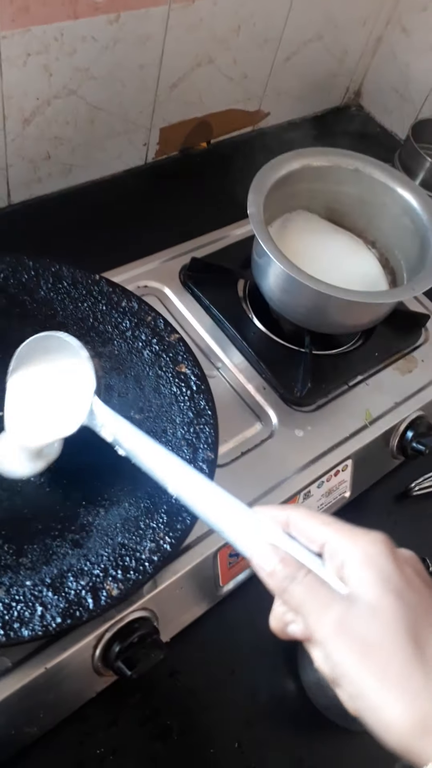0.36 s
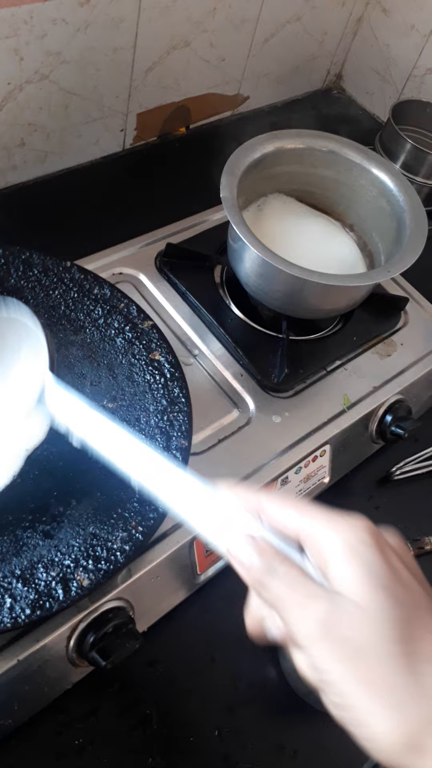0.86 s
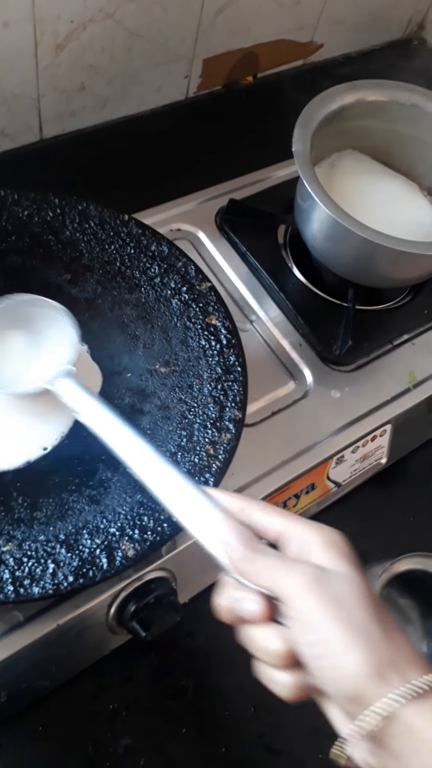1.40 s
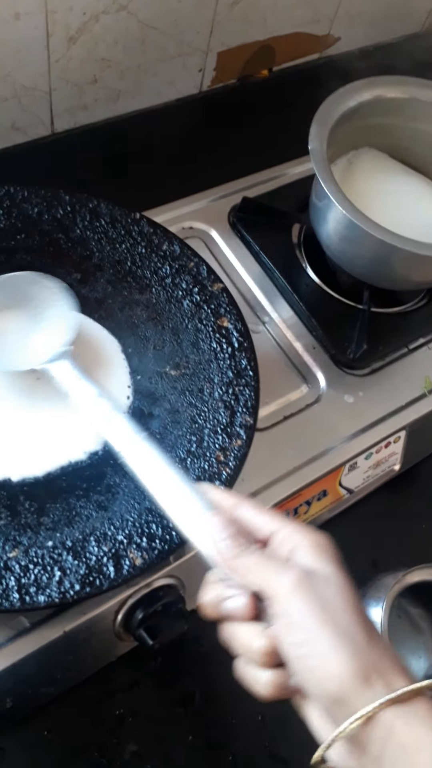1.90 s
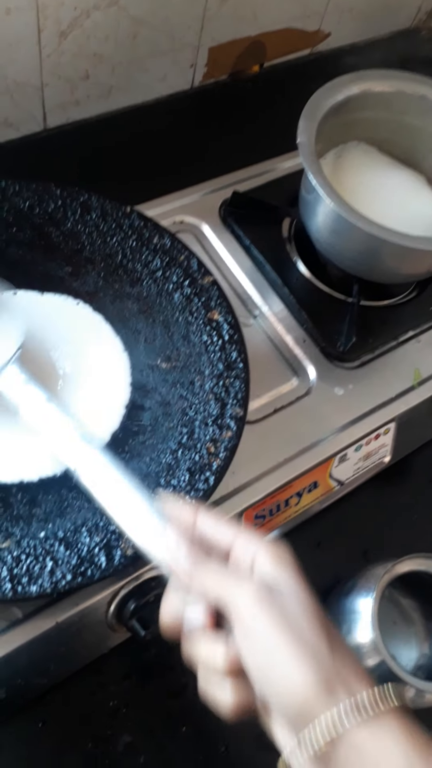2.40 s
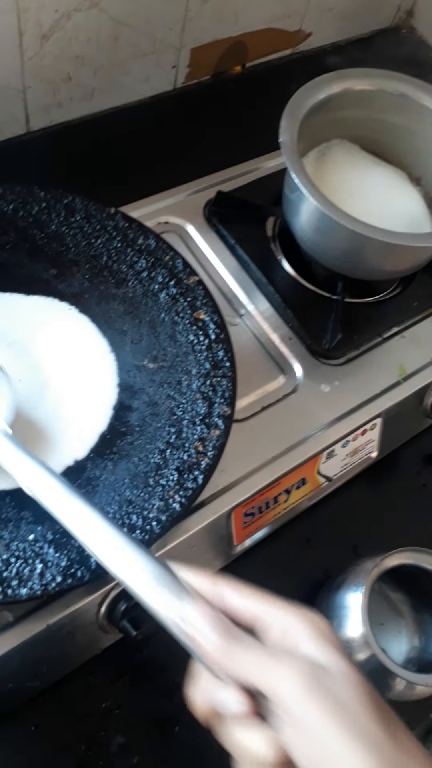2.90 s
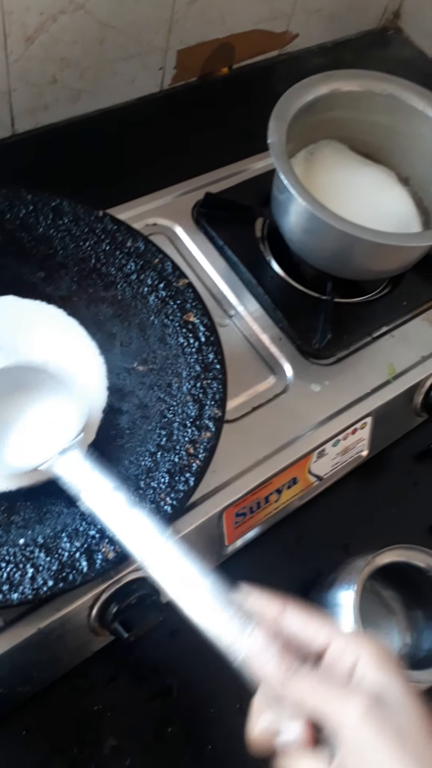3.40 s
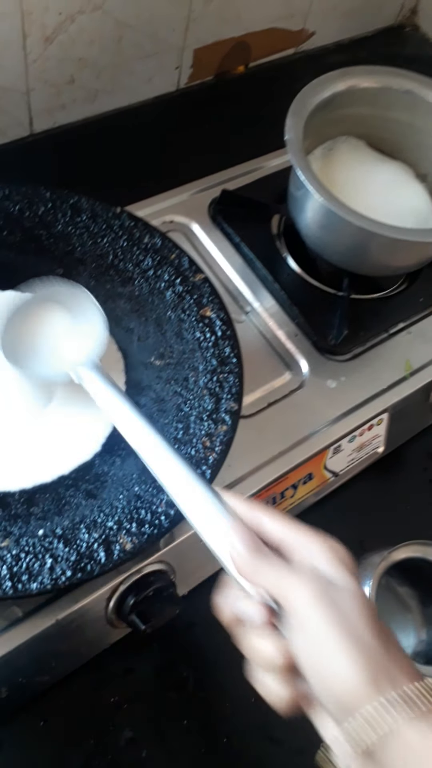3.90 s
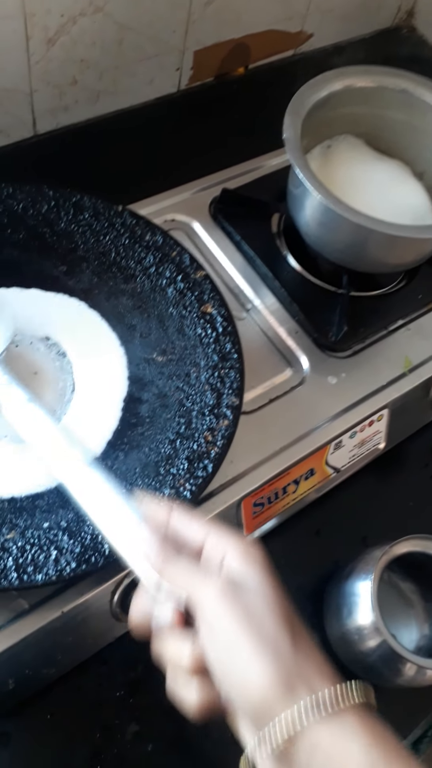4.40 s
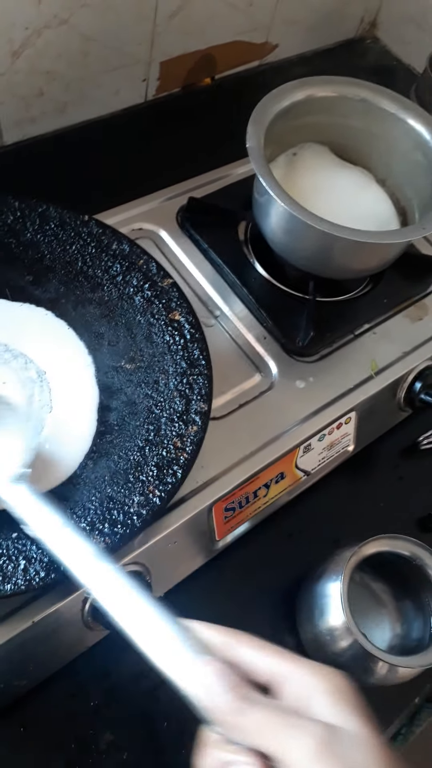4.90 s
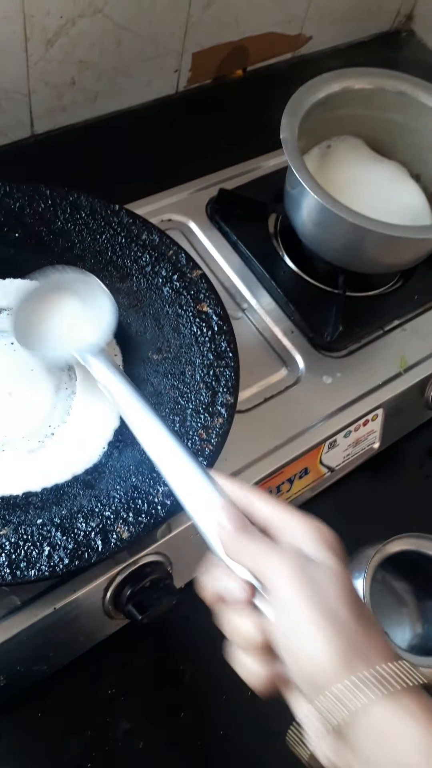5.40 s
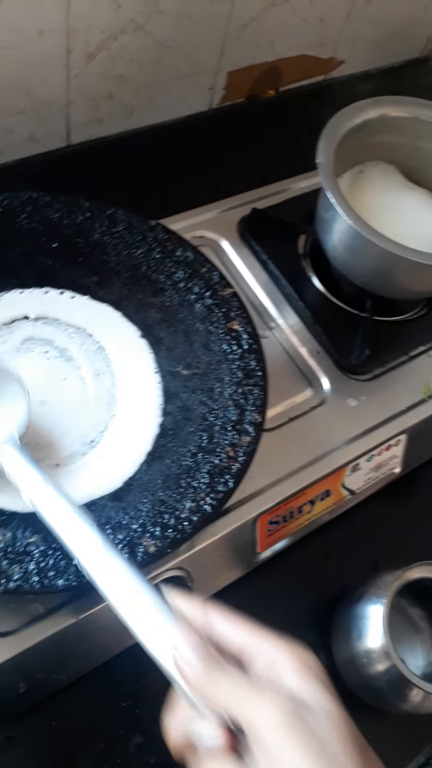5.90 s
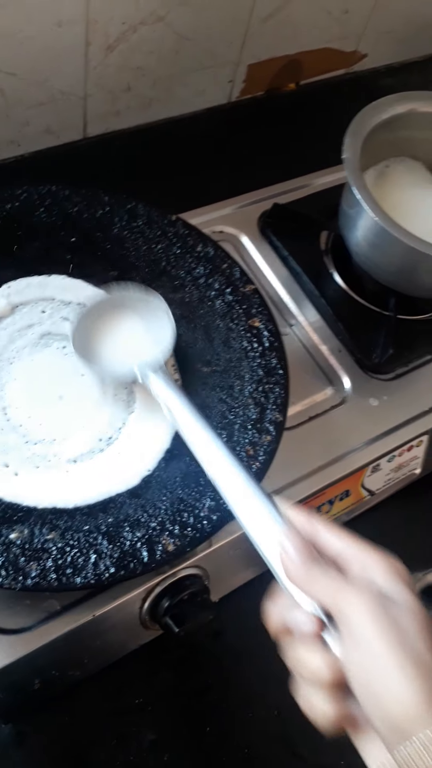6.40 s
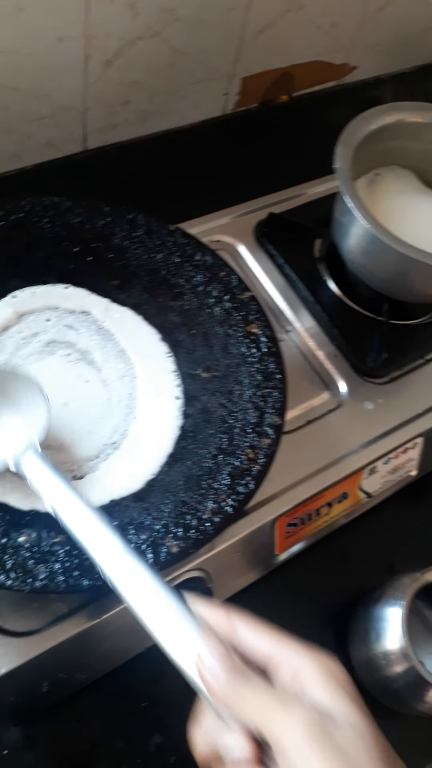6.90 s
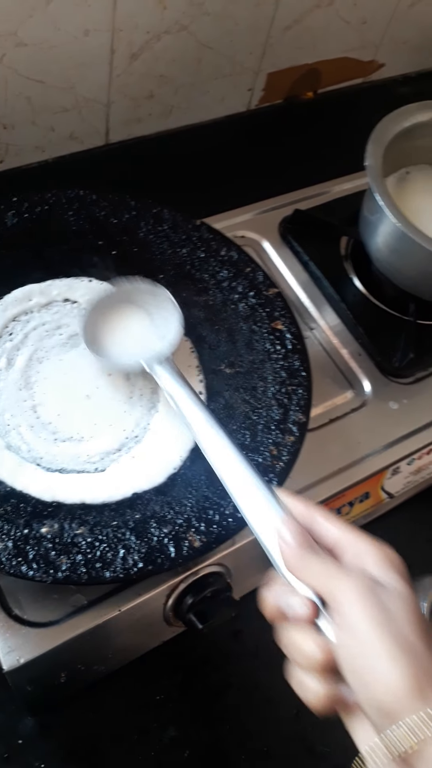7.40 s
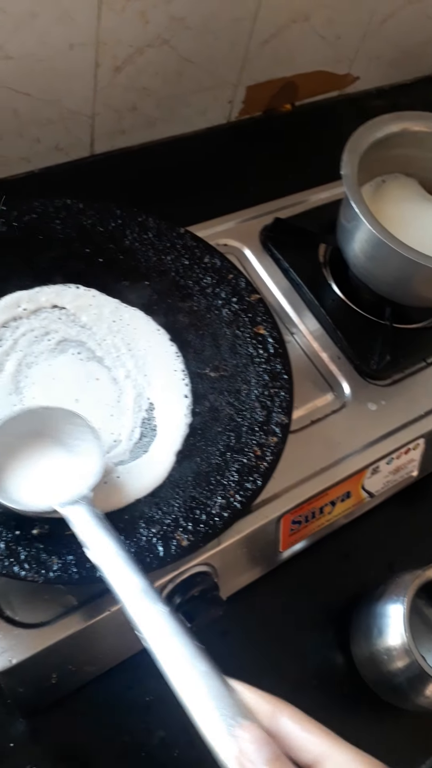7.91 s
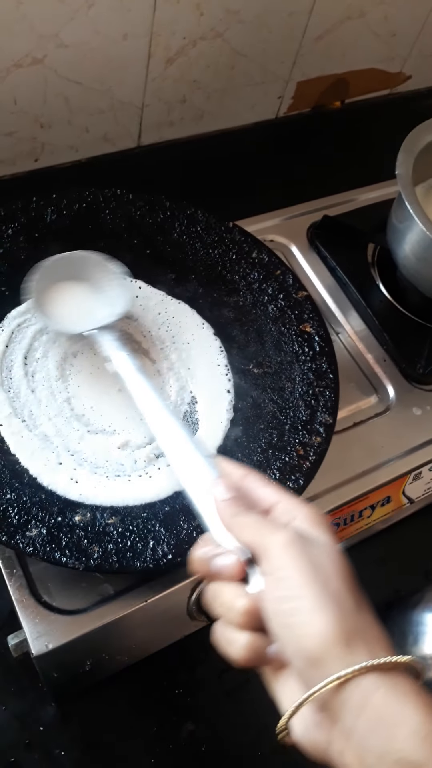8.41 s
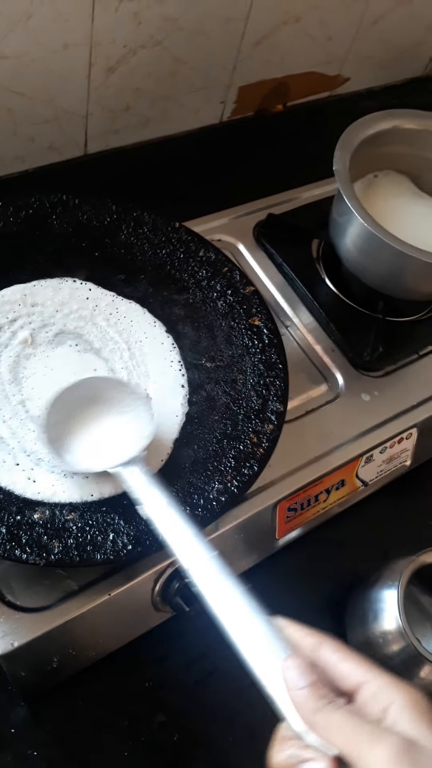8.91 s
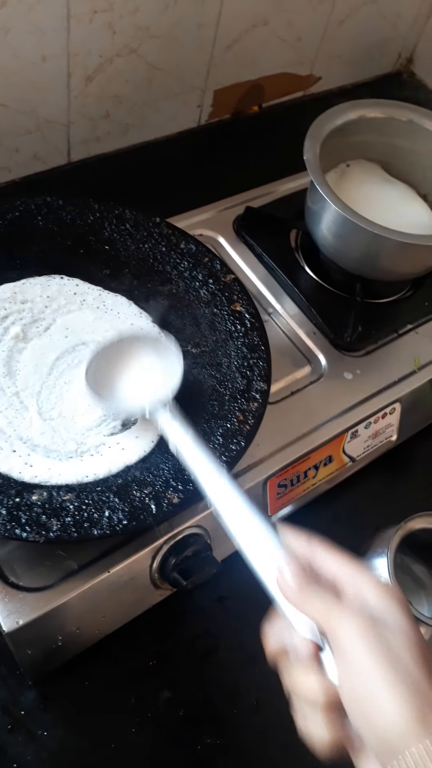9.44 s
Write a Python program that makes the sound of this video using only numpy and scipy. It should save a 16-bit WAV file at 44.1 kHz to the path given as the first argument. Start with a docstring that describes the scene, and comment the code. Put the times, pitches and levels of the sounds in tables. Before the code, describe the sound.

Close phone microphone in a home kitchen: wet batter sizzles on an iron pan, strongest in the first two seconds, then swelling and dipping about once or twice a second. The fizz is bright and grainy with a metallic edge. Low gas rumble sits underneath. Background wooden knocks and soft thuds punctuate the middle; sharp pops and thin bangle ticks stand out as the sizzle weakens towards the end.

```python
"""Batter on a hot iron pan

Batter is poured on a hot iron pan and spread in circles with a steel ladle. Steam bubbles burst under it
in surges (noise and sparse clicks in five bands) and ring the iron (resonances driven by bursts).
A gas flame and the room hum low (coloured noise), single pops spit, bangles jingle on the cook's wrist
(ticks ringing metal modes), and wooden knocks and dull thuds (decaying modes with noise) come from
further off in the kitchen. One phone microphone, close by."""
import sys
import numpy as np
from scipy import signal
from scipy.fft import rfft, irfft, next_fast_len
from scipy.io import wavfile
from scipy.ndimage import uniform_filter1d

SR = 44100
rng = np.random.default_rng(int(sys.argv[2]) if len(sys.argv) > 2 else 0)


def persist_wave(psi):
    """Save psi, clipped to +-1, as 16-bit WAV."""
    counts = np.round(np.clip(psi, -1, 1) * 32767).astype(np.int16)
    wavfile.write(sys.argv[1], SR, np.atleast_2d(counts).T)


def makeup_ratio(level_db):
    """Linear amplitude ratio for a level in decibels (20 dB per factor of ten)."""
    decades = np.asarray(level_db, float) / 20
    return 10 ** decades


N = 421155
TIME = np.arange(N) / SR
SIZE = next_fast_len(N)
FREQ = np.arange(SIZE // 2 + 1) * SR / SIZE + 1e-3  # the offset avoids division by 0


def unit(x):
    """Scale to rms 1."""
    return x / np.sqrt(np.mean(x ** 2))


def shaped(x, gain):
    """Filter by a response given on the frequency grid."""
    return irfft(rfft(x, SIZE) * gain, SIZE)[:N]


def colour(table):
    """Gain on the frequency grid of a (frequency [Hz], level [dB]) table, joined along log frequency."""
    hz, db = np.transpose(table)
    return makeup_ratio(np.interp(np.log(FREQ), np.log(hz), db))


def between(low_hz, high_hz, order=6):
    """Band with soft power-complementary edges."""
    return 1 / np.sqrt((1 + (low_hz / FREQ) ** order) * (1 + (FREQ / high_hz) ** order))


def resonance(hz, width_hz):
    """Causal resonance, gain 1 at the centre."""
    return 1 / (1 + 1j * (FREQ - hz ** 2 / FREQ) / width_hz)


def walk(rate):
    """Random levels held 1 / rate s and slewed twice; rms 1."""
    hold = int(SR / rate)
    steps = np.repeat(rng.standard_normal(N // hold + 1), hold)
    slewed = uniform_filter1d(uniform_filter1d(steps, hold), hold)
    return unit(slewed[:N])


def add(out, s, sound):
    """Mix a sound in at time s."""
    i = int(s * SR)
    out[i:i + len(sound)] += sound[:N - i]


def ring(hz, t60, length=.6):
    """One mode decaying by 60 dB in t60 seconds."""
    t = TIME[:int(length * SR)]
    return np.sin(2 * np.pi * hz * t) * makeup_ratio(-60 * t / t60)


def band_noise(noise, order, edges_hz):
    """Noise held between two frequencies by a Butterworth filter."""
    return signal.lfilter(*signal.butter(order, edges_hz, "band", fs=SR), noise)


def room(x):
    """Tiled kitchen: the direct sound plus a decaying noise tail."""
    t60_s, tail_db = .3, -6
    t = TIME[:int(.5 * SR)]
    tail = rng.standard_normal(len(t)) * makeup_ratio(-60 * t / t60_s) * np.clip(t / 0.01, 0, 1)
    tail = tail / np.sqrt(np.sum(tail ** 2))
    return x + makeup_ratio(tail_db) * signal.fftconvolve(x, tail)[:N]


def follow(usual_db, *rule):
    """Level in dB of a layer that the boil drives: a weighted sum of the boil's departures from usual."""
    # surges as the ladle spreads batter onto bare iron: (time [s], fine fizz [dB],
    # hiss near 4 kHz [dB], body near 2.5 kHz [dB], treble [dB])
    boil = np.array([(0.0, -44, -56, -53, -49.5), (0.32, -37, -53, -52.5, -45.5), (0.4, -32, -33, -38, -43),
                     (0.53, -29, -31.5, -25.5, -49), (0.69, -26, -26, -22, -46),
                     (0.9, -27, -32.5, -24, -37), (1.25, -42.5, -46, -39, -52),
                     (1.36, -37.5, -47, -37, -46), (1.51, -28, -35.5, -32.5, -48),
                     (1.57, -28, -31, -25, -49), (1.62, -29, -25.5, -22.5, -53),
                     (1.7, -24.5, -29.5, -20.5, -39), (1.91, -29, -36, -33, -40), (2.2, -28, -31, -30, -42),
                     (2.23, -28, -29.5, -26.5, -46), (2.5, -27.5, -31.5, -32, -37),
                     (2.85, -37.5, -44.5, -38.5, -50.5), (3.08, -30.5, -34.5, -35, -40),
                     (3.24, -34, -41.5, -40, -45), (3.48, -39, -49, -41.5, -49),
                     (3.67, -26, -29.5, -32.5, -45), (3.83, -28, -33, -32, -38.5),
                     (4.12, -35, -38.5, -38, -47.5), (4.31, -26, -29.5, -33.5, -45),
                     (4.76, -35.5, -39.5, -35.5, -47), (4.92, -29.5, -35, -34.5, -49),
                     (5.24, -35, -35.5, -36.5, -47), (5.29, -30.5, -34.5, -34, -41.5),
                     (5.64, -30, -33.5, -33.5, -45), (5.98, -31, -34.5, -35.5, -46),
                     (6.36, -30.5, -33, -34, -41), (6.49, -33.5, -39.5, -40.5, -47),
                     (6.89, -40.5, -44, -33, -56.5), (7.26, -27.5, -35.5, -36, -43),
                     (7.53, -39, -43, -42.5, -51), (7.74, -39.5, -44.5, -43, -50.5),
                     (7.98, -31.5, -34, -39.5, -54), (8.08, -35, -30.5, -37, -47),
                     (8.48, -31.5, -38.5, -38, -43), (8.88, -40, -43.5, -42, -53),
                     (8.93, -41, -42.5, -41, -49), (9.18, -44, -45, -44, -53),
                     (9.31, -41, -48.5, -45, -53.5), (9.55, -46, -51, -49, -54.5)])
    # usual boil: fizz [dB], hiss [dB], body [dB], treble [dB]
    usual_boil = (-32, -37, -36, -44)
    slopes, late_s = rule[:-1], rule[-1]
    level_db = usual_db + (boil[:, 1:] - usual_boil) @ slopes
    return np.interp(TIME - late_s, boil[:, 0], level_db)


def linger(gain, seconds):
    """The power of a gain dies away exponentially, to 1/e in the given time."""
    keep = np.exp(-1 / (max(seconds, 1e-3) * SR))
    power = signal.lfilter([1 - keep], [1, -keep], gain ** 2, zi=[keep * gain[0] ** 2])[0]
    return np.sqrt(power)


def ripple(depth_db, width_hz):
    """The plate's countless weak modes: fine random peaks and dips along frequency."""
    k = int(width_hz * SIZE / SR)
    peaks = uniform_filter1d(uniform_filter1d(rng.standard_normal(len(FREQ)), k), k)
    return makeup_ratio(depth_db * unit(peaks))


def bursts(per_s, spread_db, share):
    """Bubbles bursting: sparse clicks of uneven size over the blur of countless tiny ones."""
    size = makeup_ratio(spread_db * np.minimum(rng.exponential(size=N), 3))
    clicks = (rng.random(N) < per_s / SR) * rng.standard_normal(N) * size
    share = np.clip(share, 0, 1)  # of the power
    return np.sqrt(share) * unit(clicks) + np.sqrt(1 - share) * rng.standard_normal(N)


def sizzle():
    """Steam bubbles burst in five size classes, big to tiny, that share their spurts."""
    # bubble classes: (low edge [Hz], high edge [Hz], rate [bursts/s], size spread [dB],
    # flicker [dB], burst share of power [0-1])
    bubble_classes = [(343, 1310, 2500, 0, 0.85, 0.38), (1340, 3870, 4600, 1.5, 1.58, 0.44),
                      (2720, 6550, 3700, 4, 0.8, 0.29), (5850, 7620, 5000, 2.5, 0.79, 0.47),
                      (9900, 15000, 2700, 9, 0.6, 0.25)]
    # how each class follows the boil: (usual level [dB], slope on fizz [dB/dB], on hiss [dB/dB],
    # on body [dB/dB], on treble [dB/dB], delay [s])
    bubble_rules = [(-43.5, 0.1, 0.0017, 0.71, 0.14, 0.038), (-40.5, -0.14, 0.076, 0.78, 0.16, .02),
                    (-37.5, -0.08, .9, 0.04, .02, .005), (-32, 0.81, 0.089, 0.0067, .02, .002),
                    (-37, -0.15, -0.15, .02, 1, .001)]
    # how much each class wavers on its own [dB]
    patchiness = (0.75, 0.54, .6, 0.35, 1.6)
    # how long each class goes on after a surge [s]
    linger_times = (.12, 0.039, .004, 0.003, .004)
    # tone of the fizz close to the pan: (frequency [Hz], level [dB])
    fizz_colour = [(200, -13.5), (400, -9.5), (1040, -8.5), (1500, 0.5), (2400, 4.5), (3300, 0.5),
                   (4900, -5), (6500, -1), (7200, 0.5), (8700, -6), (9500, -16), (10300, -7.5),
                   (11800, -5.5), (15800, -5.5)]

    spurt, patter = walk(14), walk(70)
    out = 0
    for bubble, rule, patchy_db, tail_s in zip(bubble_classes, bubble_rules, patchiness, linger_times):
        low_hz, high_hz, per_s, spread_db, flicker_db, share = bubble
        plate = ripple(1.1, 25)
        tone = colour(fizz_colour) * between(low_hz, high_hz) * between(355, SR, order=8) * plate
        grain = unit(shaped(bursts(per_s, spread_db, share), tone))
        surge = linger(makeup_ratio(follow(*rule)), tail_s)
        flicker = flicker_db * (spurt + 0.9 * patter) + patchy_db * walk(9)
        out = out + grain * surge * makeup_ratio(flicker)
    return out


def pan():
    """The boiling drives the iron's modes; the patch wanders over the plate, so each swells and fades."""
    # iron modes in four groups: (frequency [Hz], width [Hz], level [dB])
    deep_modes = [(1223, 32, -17), (1473, 38, -16), (1668, 45, -18), (1814, 32, -20), (2000, 35, -12),
                  (2058, 22, -12), (2120, 35, -13), (2197, 30, -5)]
    middle_modes = [(2413, 32, 0), (2550, 50, -12), (2680, 50, -12), (2847, 20, -1)]
    high_modes = [(3478, 34, 0), (3630, 50, -13), (4010, 25, -14), (4247, 26, -4), (4340, 40, -13),
                  (5150, 28, -7)]
    top_modes = [(6148, 55, -4), (7225, 60, -2), (8410, 140, -6)]
    # how each group, deep to top, follows the boil: (usual level [dB], slope on fizz [dB/dB],
    # on hiss [dB/dB], on body [dB/dB], on treble [dB/dB], delay [s], early if negative)
    mode_rules = [(-43.5, 0.0067, -0.14, 1.31, -0.011, 0.016), (-43, 0.018, 0.21, 1.09, 0.04, -0.0061),
                  (-43.5, .02, 1.29, 0.018, -0.026, -0.016), (-40.5, 0.94, 0.024, .02, -.1, -0.048)]

    drive = rfft(bursts(3000, 2.5, .4), SIZE)
    out = 0
    for modes, rule in zip((deep_modes, middle_modes, high_modes, top_modes), mode_rules):
        surge_db = follow(*rule)
        for hz, width_hz, mode_db in modes:
            wander_db = 2.0 * walk(6)
            tone = unit(irfft(drive * resonance(hz, width_hz), SIZE)[:N])
            out = out + tone * makeup_ratio(surge_db + mode_db + wander_db)
    return out


def kitchen():
    """Gas flame rumble as coloured noise, with wavering low hums as narrow bands of noise."""
    # tone of the rumble: (frequency [Hz], level [dB])
    rumble_colour = [(24, -40), (40, -12), (128, 5.5), (200, -1.5), (260, 8.5), (324, 5), (511, 5.5),
                     (699, 10), (761, -52), (1200, 0.5), (1560, -36), (2640, -120)]
    # low hums: (frequency [Hz], width [Hz], level [dB])
    hums = [(55, 16, -8), (95, 9, -3), (165, 9, -6), (182, 9, -5), (516, 20, -5), (705, 22, -6)]
    # loudness of rumble and hums: (time [s], level [dB])
    flame_levels = [(0.0, -62), (0.18, -62), (3.32, -61.5), (3.59, -56), (5.05, -62), (8.19, -59.5),
                    (8.38, -60.5), (8.88, -63), (9.55, -60)]

    rumble = shaped(rng.standard_normal(N), colour(rumble_colour) * between(45, 840))
    out = makeup_ratio(2.5) * unit(rumble)
    for hz, width_hz, db in hums:
        waver_db = 1.8 * walk(1.8)
        hum = unit(shaped(rng.standard_normal(N), resonance(hz, width_hz)))
        out += makeup_ratio(db + waver_db) * hum
    level_db = np.interp(TIME, *np.transpose(flame_levels))
    return out * makeup_ratio(level_db + 1.2 * walk(2.7))


def pops():
    """Bigger steam pockets: a few ms of noise, a body near 7 kHz and a bright spit."""
    # louder single pops: (time [s], level [dB])
    pop_times = [(0.0794, -29), (1.3423, -35.5), (3.5124, -28), (4.651, -27), (4.7212, -29.5),
                 (4.7481, -31), (6.6957, -37), (6.8054, -29.5), (6.8506, -26), (6.9735, -30),
                 (7.126, -21.5), (7.4275, -23), (7.7613, -30), (7.9914, -37.5), (9.0144, -29),
                 (9.0534, -30.5), (9.1262, -30), (9.2229, -31), (9.2844, -26.5), (9.3894, -35.5),
                 (9.4616, -28)]
    spit_db = -22  # against the body

    out, t = np.zeros(N), TIME[:int(.03 * SR)]
    envelope = np.exp(-t / 0.0042) * np.clip(t / 0.0011, 0, 1)
    for s, db in pop_times:
        noise = rng.standard_normal((2, len(t)))
        body = band_noise(noise[0], 1, [4500, 8500])
        spit = signal.lfilter(*signal.butter(2, 10000, "high", fs=SR), noise[1])
        add(out, s, makeup_ratio(db) * (unit(body) + makeup_ratio(spit_db) * unit(spit)) * envelope)
    return out


def bangles():
    """Each touch is a chatter of ticks that rings the metal modes near its favoured pitch."""
    # bangle modes: (frequency [Hz], t60 [s])
    bangle_modes = [(8930, .06), (9290, .06), (10060, .07), (10250, .05), (10590, .04), (10820, .05),
                    (11130, .04), (11400, .04), (11600, .07), (11780, .05), (12180, .04), (13330, .04),
                    (13480, .06), (13750, .06)]
    # bangles touch: (time [s], level [dB], favoured pitch [Hz], spread [Hz], rattle decay [s])
    touches = [(.194, -37, 11100, 900, 0.019), (.56, -31.5, 11130, 200, .015), (.59, -44, 13750, 100, .02),
               (1.15, -42, 10100, 200, 0.018), (1.304, -42, 10700, 900, 0.024),
               (7.675, -36, 13430, 100, 0.027), (7.676, -44, 10700, 900, 0.042),
               (8.11, -47, 10900, 915, .05), (8.475, -38.5, 11650, 200, .06),
               (8.477, -38, 13430, 100, 0.067), (8.48, -41, 10500, 300, 0.07),
               (8.91, -41, 10300, 503, 0.055), (8.93, -42, 11950, 395, 0.056),
               (8.939, -41, 13750, 99.2, 0.031), (9.27, -40, 11000, 910, .03),
               (9.275, -47, 13430, 100, 0.045), (9.29, -39, 9080, 250, 0.016),
               (9.345, -47, 11500, 696, 0.023)]

    out, t = np.zeros(N), TIME[:int(.3 * SR)]
    for s, db, centre_hz, spread_hz, rattle_s in touches:
        chatter = (rng.random(len(t)) < 900 / SR) * rng.standard_normal(len(t))
        ticks = chatter * np.exp(-t / rattle_s) * .8
        ticks[0] = .7  # first contact
        chance = rng.standard_normal((len(bangle_modes), 2))
        tone = 0
        for (hz, t60), (level, detune) in zip(bangle_modes, chance):
            favour = np.exp(-.5 * ((hz - centre_hz) / spread_hz) ** 2)
            tone = tone + favour * makeup_ratio(2 * level) * ring(hz * (1 + 0.0034 * detune), t60)
        add(out, s, makeup_ratio(db) * signal.fftconvolve(ticks, tone))
    return room(out)


def thuds():
    """Dull thuds: one low mode swells in and decays under a short boom of low noise."""
    # thuds: (time [s], level [dB], frequency [Hz], t60 [s])
    thud_times = [(1.679, -46.5, 141, 0.37), (1.721, -44, 83.5, 0.63), (3.377, -52, 184, 0.38),
                  (4.118, -37.5, 175.4, 0.35), (4.219, -51, 73, 0.29), (8.91, -48, 96.7, 0.58),
                  (9.264, -54, 60, 0.61)]

    out, t = np.zeros(N), TIME[:int(.6 * SR)]
    for s, db, hz, t60 in thud_times:
        boom = band_noise(rng.standard_normal(len(t)), 2, [45, 450]) * np.exp(-t / 0.07)
        add(out, s, makeup_ratio(db) * (ring(hz, t60) + makeup_ratio(16) * boom) * np.clip(t / 0.02, 0, 1))
    return room(out)


def knocks():
    """Wood modes, strongest near the struck spot's pitch, with a thump and a bright crack of noise."""
    # wooden knocks: (time [s], level [dB], crack against it [dB], struck spot's pitch [Hz])
    knock_times = [(2.764, -39, 7, 506), (2.887, -40, 16, 480), (3.392, -35.5, 18.5, 497),
                   (3.522, -43.5, 2.5, 415), (4.063, -35.5, 4, 498), (4.252, -42, 4, 428),
                   (4.794, -35.5, 14, 482), (5.569, -35.5, 18, 487), (6.553, -36, 18, 490),
                   (7.608, -36.5, 13, 520), (7.961, -40.5, 19, 490)]
    # wood modes: (frequency [Hz], level [dB], t60 [s])
    wood_modes = [(250, -10, .1), (320, -8, .12), (415, -5, .25), (490, 2, .09), (522, -2, .18),
                  (600, -5, .1), (670, -1, .15), (760, -5, .1)]

    out, t = np.zeros(N), TIME[:int(.6 * SR)]
    for s, db, crack_db, spot_hz in knock_times:
        chance = rng.standard_normal((len(wood_modes), 2))
        body = 0
        for (hz, mode_db, t60), (vary_db, detune) in zip(wood_modes, chance):
            off_spot_db = 8.2 * abs(np.log(hz / spot_hz))
            body = body + makeup_ratio(mode_db + vary_db - off_spot_db) * ring(hz * (1 + 0.014 * detune), t60)
        noise = rng.standard_normal((2, len(t)))
        thump = band_noise(noise[0], 2, [300, 800]) * np.exp(-t / 0.025)
        crack = band_noise(noise[1], 1, [1500, 4000]) * np.exp(-t / 0.0076)
        strike = body * np.clip(t / 0.002, 0, 1) + makeup_ratio(6) * thump + makeup_ratio(crack_db) * crack
        add(out, s, makeup_ratio(db) * strike)
    return room(out)


def scene():
    """One microphone feeds both channels."""
    mono = sizzle() + pan() + kitchen() + pops() + bangles() + thuds() + knocks()
    return np.array([mono, mono])


def band_limit(x):
    """A steep low-pass at the top of the band."""
    return signal.sosfilt(signal.butter(12, 16950, fs=SR, output="sos"), x)


def record(dry):
    """The phone cuts the deepest bass and the top."""
    band = between(46, SR, order=8) * (FREQ < 15740)
    mix = np.array([shaped(channel, band) for channel in dry])
    return band_limit(mix)


dry = scene()
out = record(dry)
persist_wave(out)
```